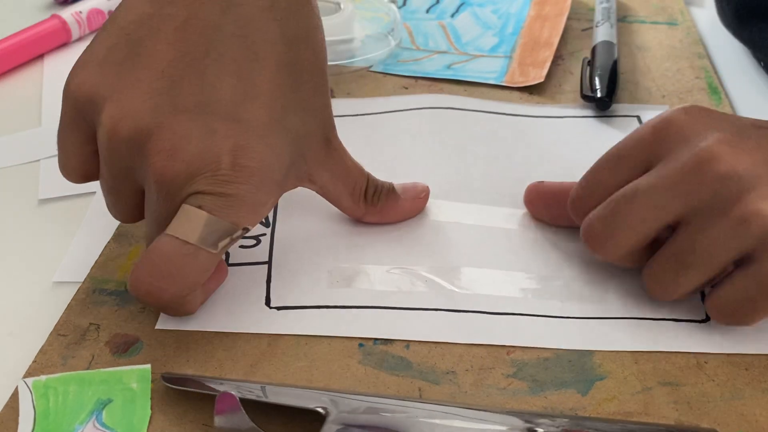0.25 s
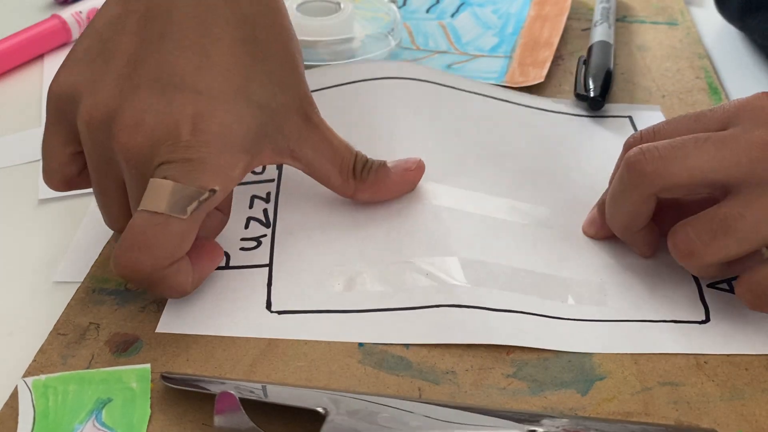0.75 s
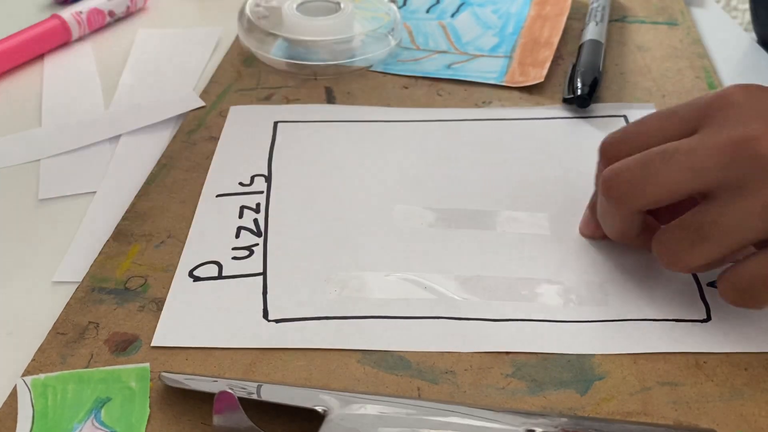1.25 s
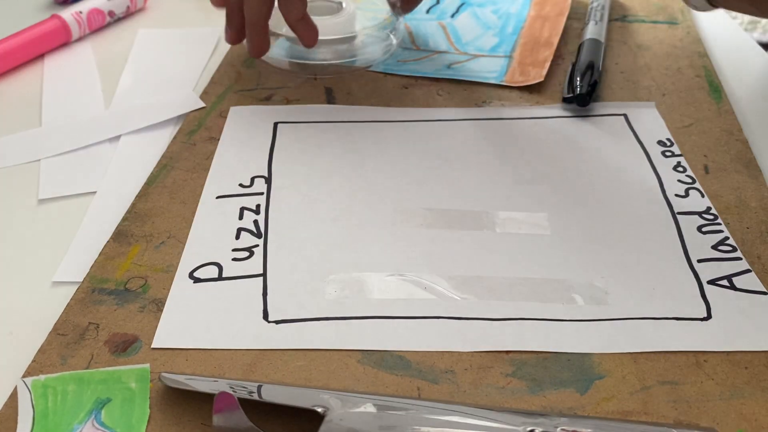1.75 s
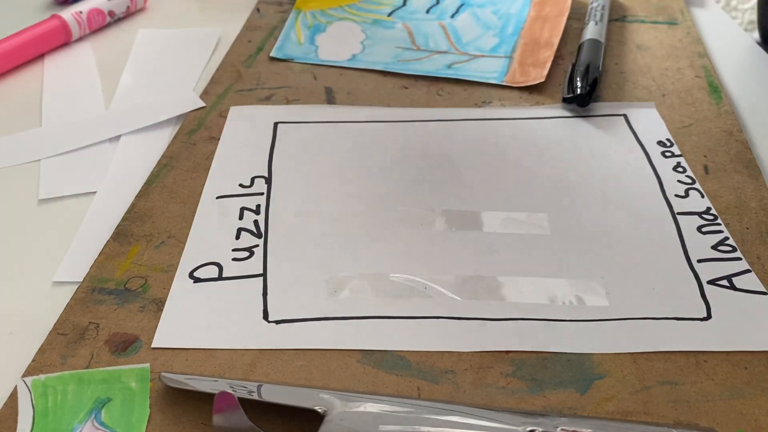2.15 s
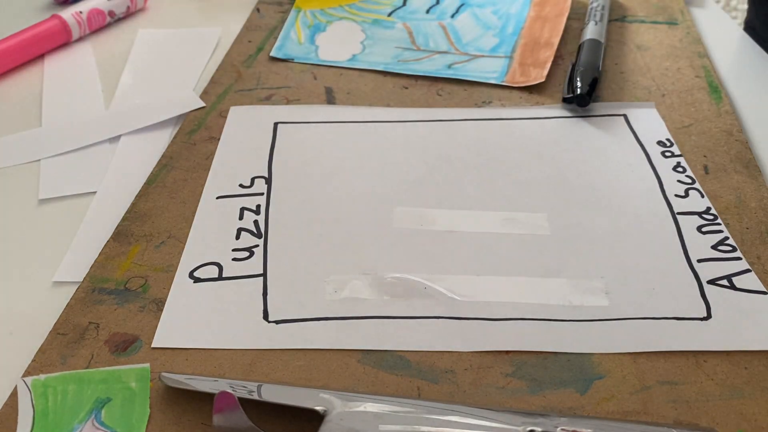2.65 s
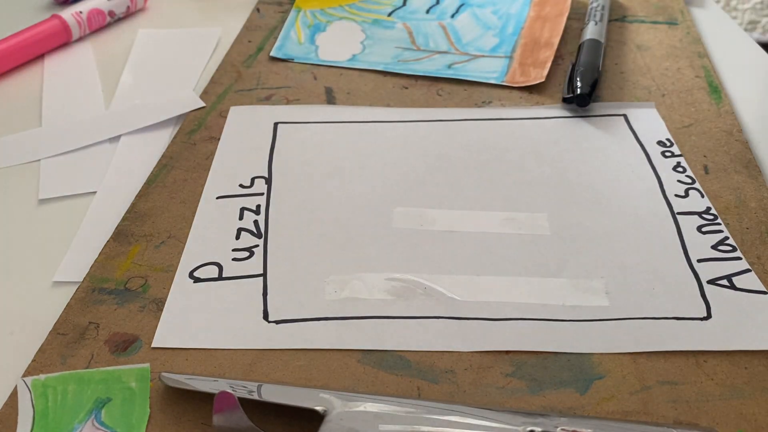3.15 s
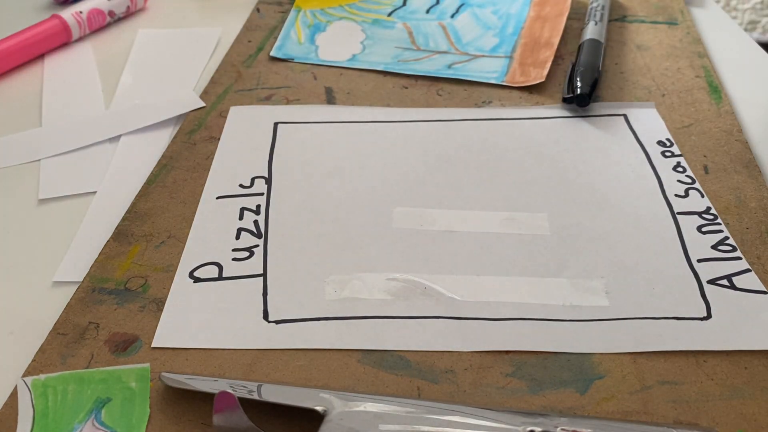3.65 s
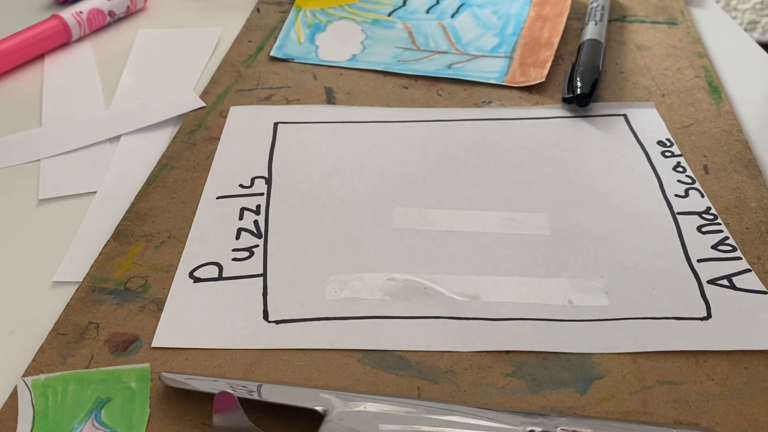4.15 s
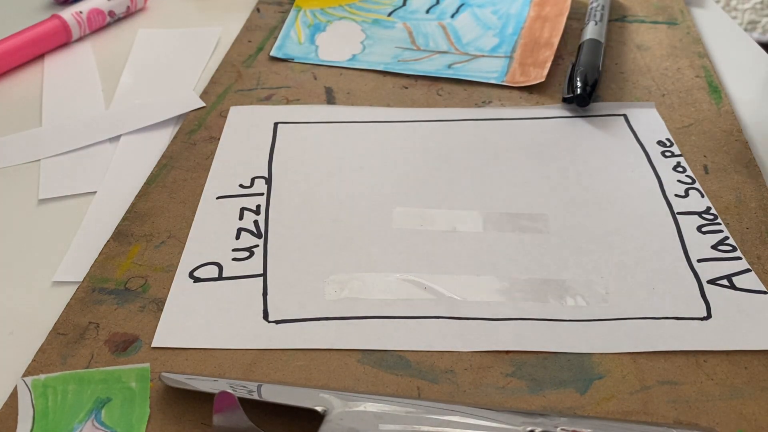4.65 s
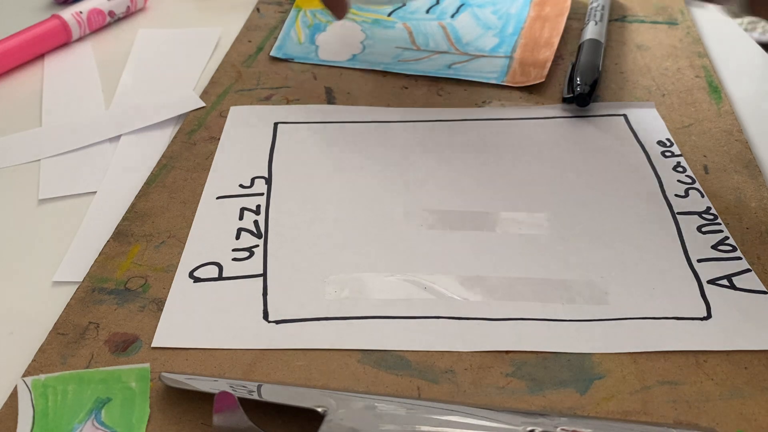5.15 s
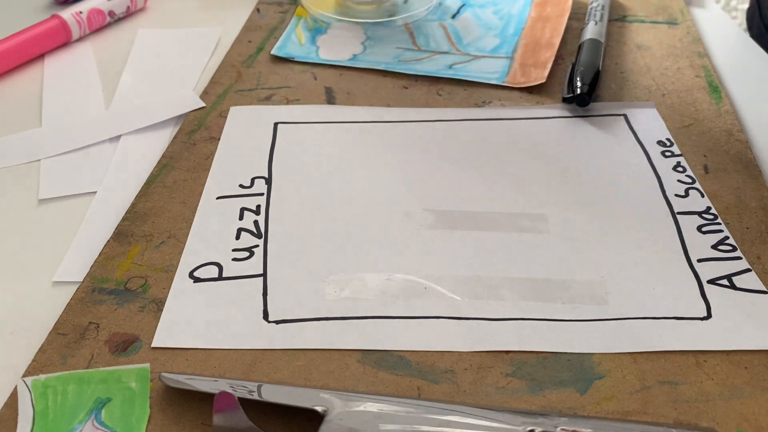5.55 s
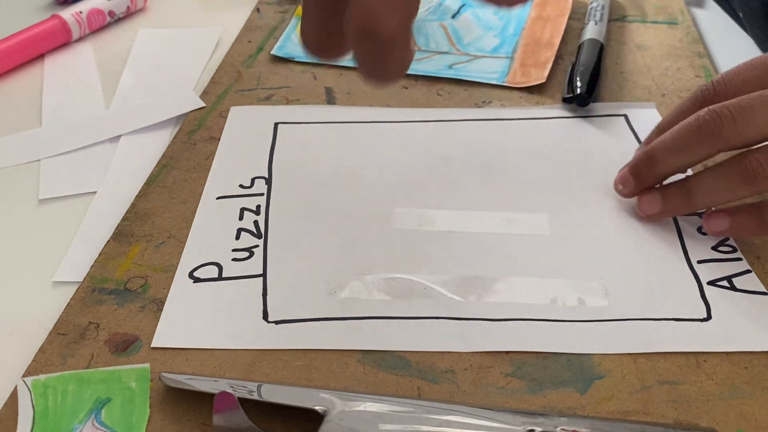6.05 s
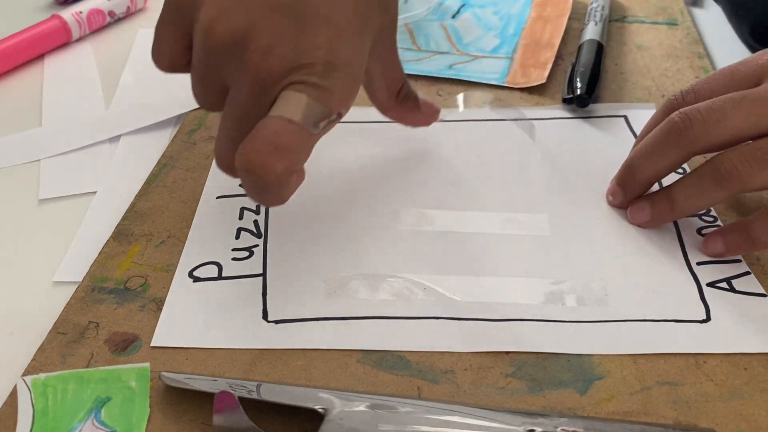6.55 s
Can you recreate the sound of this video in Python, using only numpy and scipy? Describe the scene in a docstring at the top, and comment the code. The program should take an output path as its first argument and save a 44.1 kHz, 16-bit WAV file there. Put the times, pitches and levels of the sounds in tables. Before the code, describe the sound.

Close to the microphone in a small room, hands smooth tape onto paper with light rubbing, clicks and dull desk thumps. After a brief rattle of a plastic dispenser, sticky tape is pulled out in an uneven run of crisp snaps and crackles, with tiny creaks from the roll. The strip breaks off with a crack, the dispenser knocks down on the wooden desk, and soft taps follow.

```python
"""Sticky tape at a desk

Close up, tape is pressed on paper, peeled from a plastic dispenser in slips and torn off. Each slip of
the glue cracks, flutters the taut film and rings the shell; fingers rub and the roll creaks on its hub.
Hands and dispenser knock the wooden desk, which rumbles, and a small room answers."""
import sys
import numpy as np
from scipy import signal
from scipy.fft import rfft, irfft, next_fast_len
from scipy.io import wavfile
from scipy.ndimage import uniform_filter1d, map_coordinates

SR = 44100
rng = np.random.default_rng(int(sys.argv[2]) if len(sys.argv) > 2 else 0)


def persist_wave(psi):
    """Save psi, clipped to +-1, as 16-bit WAV."""
    counts = np.round(np.clip(psi, -1, 1) * 32767).astype(np.int16)
    wavfile.write(sys.argv[1], SR, np.atleast_2d(counts).T)


N = 300321

# Tone curves: freq_hz, gain_db
ROOM_TONE_EQ = [(18, -38.5), (30, -4.5), (88, 4), (170, -10), (223, -8), (322, -20), (2190, -28.5),
                (3530, -42), (4440, -37), (7000, -52.5), (9100, -68), (15400, -120)]
HISS_EQ = [(2000, -3.5), (6000, 1.5), (13000, -2.5), (14500, -12), (17000, -17.5)]  # faint steady hiss, dulled above 14 kHz
MIC_EQ = [(20, -12.5), (40, -3), (60, 3), (12000, -2), (15800, -6), (16100, -20), (17000, -17)]
# Decay of the room: freq_hz, t60_s
ROOM_DECAY = [(150, 0.15), (1000, 0.41), (5000, 0.24), (14000, 0.19)]
# How alike left and right are: freq_hz, correlation
STEREO_LIKENESS = [(60, 1), (200, 0.89), (500, 0.66), (1200, 0.23), (3000, .85), (6000, 0.94), (16000, 1)]
# Balance of the two mic ports: freq_hz, left_over_right_db
PORT_BALANCE = [(100, 0.5), (2000, 0.5), (5500, 1.5), (7000, 0)]
# Phase between the ports: freq_hz, right_lead_turns
PORT_LEAD = [(7000, 0), (9050, .5), (11200, 1), (13500, 1.5), (15300, 2)]

# Resonances: centre_hz, width_hz, gain_db
DESK_FRAME_MODES = [(45.8, 38, -3), (64.6, 63, -3.5)]
DESK_LOW_MODES = [(97, 10, 0), (131, 48, 15.5), (176, 280, -11.5)]
DESK_TOP_MODES = [(248, 5.7, -14), (354.3, 10, 3), (510, 660, -6), (740.3, 160, -2.5)]
SHELL_MODES = [(935, 150, -2), (1250, 250, -0.5), (1703, 360, 0.5), (2270, 420, 2.5), (2590, 1500, -4.5)]  # the dispenser
FILM_MODES = [(4480, 2200, -17), (4320, 1230, 10), (5156, 1700, 11), (6050, 1290, 9), (7053, 920, 3)]  # the taut tape
GLUE_MODES = [(8880, 2200, -5), (9770, 1800, -1), (11800, 3400, -1.5), (12540, 3000, -4.5),
              (15630, 2500, -6)]  # parting glue threads, the treble

# Cue levels are faders: each layer adds its own trim. Where a row has level_db, its thud, shell,
# click and glue levels ride on it.
# Arms and hands jolting the desk: start_s, frame_db, top_db
JOLTS = [(0.062, -35, -62.5), (0.108, -37, -68), (0.162, -48.5, -45.5), (0.261, -53, -42.5),
         (0.328, -53, -45.5), (0.552, -66.5, -48.5), (0.698, -70, -52.5), (0.78, -52, -67),
         (0.85, -61.5, -47), (0.93, -59, -42.5), (1.06, -54.5, -51), (1.23, -78.5, -56), (1.38, -62, -61),
         (1.691, -67, -64), (1.8, -49, -50.5), (1.911, -63.5, -53), (2.14, -49, -82), (3.251, -66.5, -53),
         (3.31, -41.5, -65.5), (3.41, -44, -55), (3.47, -51.5, -68), (3.75, -69, -55.5), (4.59, -51, -56),
         (4.741, -85, -84), (4.89, -62, -75), (5.041, -68, -55.5), (5.128, -43.5, -48.5),
         (5.22, -53.5, -78), (5.312, -41.5, -31.5), (5.399, -58.5, -42.5), (5.482, -52, -39.5),
         (5.571, -56, -45.5), (5.69, -54.5, -44.5), (5.8, -56, -67.5), (5.95, -55.5, -55),
         (6.02, -52.5, -53), (6.238, -49.5, -46.5)]
# Hands and dispenser hitting the desk: start_s, level_db, pitch_hz, thud_db, shell_db, click_db, t60_s
KNOCKS = [(0.271, -46.5, 377, -9, -28, -10, 0.079), (0.531, -55, 336, -4, -27, 6, 0.017),
          (0.829, -45.5, 300, -28, 5.5, -2, 0.062), (0.905, -42, 666, 0, -25, -25, 0.054),
          (1.024, -38.5, 270, -10.5, -10.5, -5, 0.038), (1.038, -43, 1110, -9, 15.5, -10, 0.075),
          (1.211, -55, 343, -21.5, -32, -17.5, 0.11), (1.307, -56, 350, -19, -17, -26, 0.027),
          (1.742, -45, 1165, -19.5, -2.5, -16, 0.026), (1.808, -60, 360, 5, -20, -6, 0.033),
          (1.902, -50.5, 1036, -12, -1, -9, 0.086), (2.075, -50, 1070, -17.5, -5, -7, 0.017),
          (3.737, -52, 480, -4, -19.5, -31.5, 0.03), (3.953, -56, 500, -25, -4, -32, 0.045),
          (4.589, -45, 300, -1.5, -19.5, -30.5, 0.03), (5.097, -57, 318, 0.5, -19.5, -29.5, 0.024),
          (5.28, -30.5, 1080, -41, 14.5, 12.5, 0.037), (5.295, -21, 990, -1, 7.5, 1.5, 0.078),
          (5.359, -42.5, 390, 4.5, 10.5, -0.5, 0.096), (5.469, -44.5, 490, 0.5, 19.5, 8, 0.034),
          (5.477, -43.5, 380, 3.5, 10, -10, 0.09), (5.514, -30.5, 507, -12.5, -30, -19, 0.035),
          (5.541, -35, 354, -17, -19, -34.5, 0.05), (5.6, -41.5, 334, -10.5, -31, -28, 0.016),
          (5.679, -38.5, 637, -36, -10, -38.5, 0.059), (5.71, -47, 340, -10.5, -34.5, -37.5, 0.039),
          (5.929, -63.5, 364, 8, -4.5, -7, 0.045), (5.99, -48, 330, -2, -5, -39, 0.051),
          (6.03, -57, 335, 0.5, -13, -37, 0.043), (6.081, -52.5, 680, -10.5, 4.5, 1.5, 0.04),
          (6.176, -47, 772, -12.5, -2.5, -6, 0.06), (6.228, -51, 311, 2, -7, -9, 0.039),
          (6.321, -77.5, 345.6, -4, 5.5, 19, 0.069)]
# Swells of friction hiss, both finger slides and the hissing tails after loud snaps and knocks:
# start_s, length_s, hiss_db, scrape_db, treble_db
FRICTION_SWELLS = [(0.078, 0.071, -70, -78.5, -51.5), (0.222, .3, -67.5, -77, -59.5),
                   (0.563, 0.17, -65.5, -73, -63), (0.828, 0.083, -60, -72, -56.5),
                   (0.949, 0.054, -58.5, -65, -56.5), (1.206, 0.028, -85, -92.5, -74.5),
                   (1.766, 0.18, -73, -72.5, -72), (2.03, 0.049, -81.5, -77, -77.5),
                   (2.222, 0.053, -83, -78, -78), (2.456, 0.096, -79.5, -70, -74.5),
                   (2.659, 0.1, -78, -77.5, -68), (2.793, 0.47, -64, -67.5, -65.5),
                   (3.38, 0.099, -60.5, -65, -63), (3.546, 0.2, -76.5, -95.5, -69.5),
                   (3.73, 0.091, -66.5, -76, -60.5), (3.901, 0.067, -70, -77.5, -60),
                   (4.038, 0.22, -80, -88, -74), (4.283, 0.039, -74.5, -72.5, -103),
                   (4.433, 0.058, -75.5, -71, -86.5), (4.532, 0.15, -64.5, -74.5, -62),
                   (4.864, 0.11, -79, -74.5, -78.5), (5.193, 0.2, -76, -78, -68),
                   (5.306, 0.15, -70, -65, -82), (5.453, 0.066, -81.5, -58.5, -76),
                   (5.665, .04, -82.5, -85.5, -95.5), (5.892, 0.038, -102.5, -98, -73),
                   (5.971, 0.035, -103, -84.5, -89), (6.102, 0.24, -83.5, -86, -80),
                   (6.666, 0.082, -82, -80.5, -72.5)]
# The roll on its hub: start_s, length_s, first_pitch_hz, last_pitch_hz, lower_band_db, upper_band_db
CREAKS = [(1.748, 0.026, 1059, 1040, -65, -69.5), (1.865, 0.068, 1030, 987, -60.5, -60),
          (2.075, 0.016, 990, 976, -65.5, -77), (3.556, 0.02, 2260, 2180, -71, -86),
          (3.68, .06, 2130, 2204, -72, -88), (3.787, 0.023, 2166, 2134, -74, -91),
          (3.888, .055, 2145, 2256, -70.5, -95), (4.35, .04, 916, 929, -66, -77),
          (4.48, 0.13, 855, 872, -65, -88)]
# Short, dense rips and scuffs: start_s, level_db, shell_db, glue_db, length_s
RIPS = [(0.5715, -47.5, -9.5, -8.5, 0.027), (0.6846, -48.5, -35, -7, 0.016), (1.2, -62.5, -25, -23, 0.015),
        (1.291, -68, -12, -6.5, 0.013), (1.856, -49.5, -7, -16, 0.0384), (2.091, -86, 2.5, -11.5, 0.018),
        (2.504, -40.5, -3, -7.5, 0.024), (2.5165, -60, 13, -3.5, 0.028), (6.1977, -57.5, 6, -9.5, 0.0202)]
# Tape letting go: start_s, level_db, shell_db, pitch_hz, glue_db, crack_over_flutter_db
SNAPS = [(0.2452, -21, -20, 1970, 4.5, 34), (0.2694, -41.5, -11, 2010, 1, 8.5),
         (0.8572, -48, -8, 1690, 7, 14.5), (0.9193, -51, -4.5, 1660, -8, 5),
         (0.9785, -46.5, -19.5, 1680, -3, 14), (0.9998, -49.5, -8, 1620, -1.5, 5.5),
         (1.0238, -15, -16, 1690, -7, 19), (2.2214, -79, -2.5, 2190, -5, 8),
         (2.2455, -51.5, -14.5, 1230, 2.5, 6.5), (2.2761, -64.5, 0.5, 2140, -10.5, 1.5),
         (2.4295, -52.5, 2, 2166, -20, 22.5), (2.6713, -60.5, 1, 1720, -10, -5.5),
         (2.821, -42, -3.5, 1240, -5.5, 14), (2.841, -37, -4.5, 1660, 17, 10.5),
         (3.0433, -52, -8.5, 1600, -7.5, 2.5), (3.147, -22.5, -9.5, 1880, 7, 11),
         (3.1694, -19, -4, 1840, 1.5, 11.5), (3.1886, -29, 3, 2050, 8.2, 5.5),
         (3.1975, -25, -1.5, 1800, 5.5, 7), (3.3776, -20.5, -8.5, 1590, 3, 9.5),
         (3.3933, -23, -13.5, 2290, -1, 14), (3.4426, -18, -14, 1800, 6, 16),
         (3.7363, -19, -13.5, 1800, 7, 11), (3.95, -42.5, 4, 2270, -0.5, 0.5),
         (4.0195, -65.5, 6, 1290, 1.5, 10), (4.0607, -56.5, -8, 2060, 7.5, 11),
         (4.1021, -61.5, -27.5, 1770, 8.5, 3.5), (4.1881, -61.5, -8, 1630, 12, 13),
         (4.2652, -56.5, 12, 1970, -7, -1.5), (4.2858, -52.5, -6, 1723, 6, 10.5),
         (4.3192, -72.5, 17, 1710, 4, 6), (4.344, -57.5, 19.5, 1725, -19, 27),
         (4.3922, -61, 12.5, 2130, -19.5, 7), (4.4312, -50, 6.5, 1420, -20, 13),
         (4.481, -37.5, -21, 1009, -5.5, 12.5), (4.5266, -42.5, -7, 2230, 9, 9),
         (4.5456, -41, -7.5, 1690, 1.5, 1), (4.5719, -53.5, 6, 1580, -18.5, 16.5),
         (4.5882, -14, -4, 1675, -3, 9), (4.605, -42.5, -5.5, 1595, -1, 1.5),
         (4.7143, -44.5, -3.5, 1206, -17.5, 12.5), (4.858, -61.5, 5.5, 1195, -5.5, 9.5),
         (4.889, -49.5, -15.5, 1104, -8, 11), (4.9288, -52, -5.5, 2280, -12, 13.5),
         (4.9522, -49, -3, 1148, -19, 9), (5.2052, -56.5, -12, 1980, 11, 2.5),
         (5.226, -34, -32.5, 2050, -15.5, 6), (5.519, -55.5, -20, 2000, 9.5, 8.5),
         (6.27, -69, -15, 2000, 14.5, 9.5)]

FRICTION_SLOPES_DB_S = 350.5, 174  # rise, fall
PEEL_START_S, PEEL_END_S = 2.62, 3.8


def amp(db):
    """Gain of a level in dB."""
    return 10 ** (np.asarray(db) / 20)


def unit(x):
    """x at rms 1."""
    return x / np.sqrt(np.mean(x ** 2) + 1e-20)


def along(points, hz):
    """Read a (freq_hz, value) curve on a log frequency axis."""
    freqs, values = np.transpose(points)
    return np.interp(np.log(hz + 1), np.log(freqs + 1), values)


def noise():
    """Two unrelated white noises."""
    return rng.standard_normal((2, N))


def wobble(rate):
    """A smooth random curve, rate knots a second."""
    coarse = np.arange(0, N + 8, 8)
    knots = rng.standard_normal(int(N * rate / SR) + 4)
    return np.interp(np.arange(N), coarse, map_coordinates(knots, [coarse * rate / SR]))


def filtered(x, response):
    """x through a complex frequency response."""
    size = next_fast_len(N + SR // 2)
    return irfft(rfft(x, size) * response(np.fft.rfftfreq(size, 1 / SR)), size)[..., :N]


def ring(x, *banks):
    """x through resonator banks in series, each scaled so that white noise keeps its rms."""
    def response(hz, modes):
        bank = sum((-1) ** k * amp(db) * 1j * hz * width / (centre ** 2 - hz ** 2 + 1j * hz * width)
                   for k, (centre, width, db) in enumerate(modes))
        return bank / np.sqrt(np.mean(abs(bank) ** 2))
    return filtered(x, lambda hz: np.prod([response(hz, modes) for modes in banks], axis=0))


def dying(db, t60_s, rise_s):
    """One hit envelope a row: a quick attack, then a steady fall in dB."""
    t = np.arange(SR // 8) / SR
    return (1 - np.exp(-t / rise_s)) * amp(np.c_[db] - 60 * t / np.reshape(t60_s, (-1, 1)))


def swells(start, length, db, rise_db_s, fall_db_s):
    """A fader ride: each cue rises, holds and falls at steady dB rates; overlaps add in power."""
    t = np.arange(0, N + 64, 64) / SR
    before = np.maximum(np.c_[start] - t, 0)
    after = np.maximum(t - np.c_[start + length], 0)
    gains = amp(np.c_[db] - rise_db_s * before - fall_db_s * after)
    return np.interp(np.arange(N) / SR, t, np.linalg.norm(gains, axis=0))


def lay(times, rows):
    """Mix rows of samples onto the timeline at their start times."""
    where = np.round(times * SR).astype(int)[:, None] + np.arange(rows.shape[1])
    return np.bincount(where.ravel(), rows.ravel(), N + SR)[:N]


def bursts(times, envelopes):
    """Two unrelated noises under each envelope."""
    return np.array([lay(times, envelopes * rng.standard_normal(envelopes.shape)) for _ in range(2)])


def tones(times, hz, envelopes):
    """A sine under each envelope."""
    t = np.arange(envelopes.shape[1]) / SR
    return lay(times, envelopes * np.sin(2 * np.pi * np.c_[hz] * t))


def steadied(x, amount=0.4):
    """Gently compress a narrow noise to even out its chance swells."""
    return unit(x / (uniform_filter1d(abs(x), size=700) + 0.22) ** amount)


def stereo(two):
    """Use two unrelated signals as mid and side, with a width that depends on frequency."""
    def mid_side_gains(hz):
        angle = np.arccos(along(STEREO_LIKENESS, hz)) / 2
        return np.array([np.cos(angle), np.sin(angle)])
    mid, side = filtered(two, mid_side_gains)
    return np.array([mid + side, mid - side])


def noise_bed(eq, level_db):
    """A steady bed of shaped noise: the air of the room or a faint hiss."""
    return amp(level_db) * unit(filtered(noise(), lambda hz: amp(along(eq, hz))))


def room_reverb(x):
    """Each frequency dies at its own speed; every quarter second meets a fresh tail."""
    step, predelay = SR // 4, 150  # samples
    wet = np.zeros((2, N + 2 * SR))
    for start in range(0, N, step):
        hz, t, spectra = signal.stft(rng.standard_normal((2, SR // 2)), SR, nperseg=256)
        likeness = along(STEREO_LIKENESS, hz)[:, None]
        spectra[1] = likeness * spectra[0] + np.sqrt(1 - likeness ** 2) * spectra[1]
        decay = amp(-60 * t / along(ROOM_DECAY, hz)[:, None])
        tail = signal.istft(spectra * decay, SR, nperseg=256)[1]
        echo = signal.fftconvolve(x[None, start:start + step], tail / np.linalg.norm(tail[0]), axes=1)
        wet[:, start + predelay:][:, :echo.shape[1]] += echo
    return wet[:, :N]


def desk_rumble(hold_s=0.0098, rise_db_s=453.5):
    """Each jolt shakes the desk's frame and top at their lowest modes."""
    start, frame_db, top_db = np.transpose(JOLTS)
    start = start - hold_s / 2
    frame = steadied(unit(ring(noise(), DESK_FRAME_MODES, DESK_FRAME_MODES)))
    top = steadied(unit(ring(noise(), DESK_LOW_MODES + DESK_TOP_MODES[:2])))
    return (frame * swells(start, hold_s, frame_db - 5.5, rise_db_s, fall_db_s=219)
            + top * swells(start, hold_s, top_db - 8, rise_db_s, fall_db_s=257.5))


def desk_knocks(soft_hz=2600):
    """Blunt blows ring the desk top, exciting little above soft_hz; hard plastic adds shell and click."""
    start, db, _, thud_db, shell_db, click_db, t60 = np.transpose(KNOCKS)
    thud = ring(bursts(start, dying(db + thud_db + 10, t60_s=0.048, rise_s=0.0059)), DESK_LOW_MODES)
    wood = ring(bursts(start, dying(db + 1.5, 0.99 * t60, rise_s=0.0036)), DESK_TOP_MODES)
    shell = ring(bursts(start, dying(db + shell_db + 0.5, t60, rise_s=0.00089)), SHELL_MODES)
    contact = bursts(start, dying(db + click_db + 0.5, 0.46 * t60, rise_s=0.0004))
    click = ring(contact, FILM_MODES + GLUE_MODES)
    return filtered(thud + wood + shell, lambda hz: 1 / (1 + 1j * hz / soft_hz) ** 2) + click


def knock_tones():
    """The place of the blow picks the pitch that stands out; the strongest desk mode booms under it."""
    start, db, hz, thud_db = np.transpose(KNOCKS)[:4]
    boom_hz = DESK_LOW_MODES[1][0]
    boom = tones(start + 0.0012, boom_hz, dying(db + thud_db + 4.5, t60_s=0.047, rise_s=0.004))
    return tones(start, hz, dying(db - 0.4, t60_s=0.046, rise_s=0.0011)) + boom


def friction_hiss(catches_per_s=60):
    """Uneven noise with tiny catches on top: finger slides and the hissing tails after loud hits."""
    start, length, hiss_db, scrape_db, treble_db = np.transpose(FRICTION_SWELLS)
    catches = amp(2.3 * rng.exponential(size=N)) * (rng.random(N) < catches_per_s / SR)
    grit = np.convolve(np.minimum(catches, 20), amp(-0.25 * np.arange(200)))[:N]
    grip = amp(2 * wobble(23) + 0.68 * wobble(60)) * (1 + 0.095 * grit)
    layers = (hiss_db, FILM_MODES), (scrape_db, SHELL_MODES + DESK_TOP_MODES[2:]), (treble_db, GLUE_MODES)
    return sum(swells(start, length, db, *FRICTION_SLOPES_DB_S) * unit(ring(grip * noise(), modes))
               for db, modes in layers)


def roll_creaks(upper_ratio=1.33):
    """The roll creaks on its hub: two narrow, fluttering bands of noise on a sliding pitch."""
    start, length, first_hz, last_hz, lower_db, upper_db = np.transpose(CREAKS)
    hz = np.interp(np.arange(N) / SR, np.c_[start, start + length].ravel(), np.c_[first_hz, last_hz].ravel())
    phase = 2 * np.pi * np.cumsum(hz) / SR
    creaks = np.zeros(N)
    for db, ratio in (lower_db, 1), (upper_db, upper_ratio):
        flutter = amp(2.5 * wobble(40)) * (wobble(150) + 1j * wobble(170))
        band = (np.exp(1j * ratio * phase) * flutter).real
        creaks += band * swells(start, length, db, rise_db_s=1200, fall_db_s=320)
    return creaks


def tape_rips(attack_s=0.0082, fall_db_s=1200):
    """Many glue threads part at once: a rasp that holds, then stops."""
    start, db, shell_db, glue_db, length = np.transpose(RIPS)
    t = np.arange(SR // 8) / SR
    release_db = fall_db_s * np.maximum(t - np.c_[length], 0)
    hold = np.minimum(t / attack_s, 1) * amp(np.c_[db] - 7.5 - release_db)
    rasp = hold * amp(2.8 * wobble(290)[:hold.size].reshape(hold.shape))
    layers = (-3, FILM_MODES), (shell_db + 1, SHELL_MODES), (glue_db + 10.5, GLUE_MODES)
    return sum(ring(bursts(start, amp(np.c_[trim_db]) * rasp), modes) for trim_db, modes in layers)


def peel_crackle(count=60, scatter_db=1):
    """Cue rows like SNAPS: tiny random snaps while the tape peels, riding on the friction treble."""
    swell_start, length, *_, treble_db = np.transpose(FRICTION_SWELLS)
    friction = swells(swell_start, length, treble_db, *FRICTION_SLOPES_DB_S)
    start, hz = rng.uniform([PEEL_START_S, 1290], [PEEL_END_S, 2480], (count, 2)).T
    db, shell_db, glue_db, crack_db = rng.normal([1.5, -0.5, 12, 9], scatter_db, (count, 4)).T
    friction_db = 20 * np.log10(friction[(start * SR).astype(int)])
    return np.c_[start, friction_db + db, shell_db, hz, glue_db, crack_db]


def snap_tones(snaps):
    """The free length of tape sets the pitch that stands out in each snap."""
    start, db, shell_db, hz = snaps.T[:4]
    return tones(start + 0.00066, hz, dying(db + shell_db + 4, t60_s=0.024, rise_s=0.00021))


def tape_snaps(snaps):
    """Each slip of the glue cracks, then the film flutters and the dispenser shell rings."""
    start, db, shell_db, _, glue_db, crack_db = snaps.T
    crack = dying(db + 3.5, t60_s=0.0067, rise_s=0.00035)
    flutter = dying(db - crack_db + 5, t60_s=0.03, rise_s=0.0018)
    slip = crack + flutter
    # Film and glue each pass one more, very broad band that trims their skirts.
    film = ring(bursts(start, amp(-2) * slip), FILM_MODES, [(6260, 16000, 0)])
    glue = ring(bursts(start, amp(np.c_[glue_db] + 2.5) * slip), GLUE_MODES, [(11500, 24000, 0)])
    shell = ring(bursts(start, dying(db + shell_db + 0.32, t60_s=0.04425, rise_s=0.0013)), SHELL_MODES)
    return film + glue + shell


def scene():
    """Close hits and their reverb over friction, rumble and room tone; pitched layers sit dead centre."""
    snaps = np.r_[SNAPS, peel_crackle()]
    hits = stereo(tape_snaps(snaps) + tape_rips() + desk_knocks())
    pitched = snap_tones(snaps) + knock_tones() + roll_creaks()
    reverb = amp(-15) * room_reverb(hits.mean(axis=0) + amp(-8) * pitched)
    background = stereo(friction_hiss() + desk_rumble() + noise_bed(ROOM_TONE_EQ, level_db=-71.5))
    return hits + pitched + reverb + background


def record(dry, cutoff_hz=17030):
    """Add faint hiss, then a phone's two ports (mids lean left, treble leads right) and a top cut."""
    def ports(hz):
        lean = amp(along(PORT_BALANCE, hz) / 2)
        lead = np.exp(1j * np.pi * np.interp(hz, *np.transpose(PORT_LEAD)))
        return amp(along(MIC_EQ, hz)) * np.array([lean / lead, lead / lean]) * (hz < cutoff_hz)
    hiss = stereo(noise_bed(HISS_EQ, level_db=-88))
    return filtered(dry + hiss, ports)


dry = scene()
out = record(dry)
persist_wave(out)
```